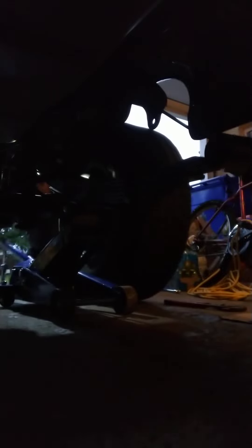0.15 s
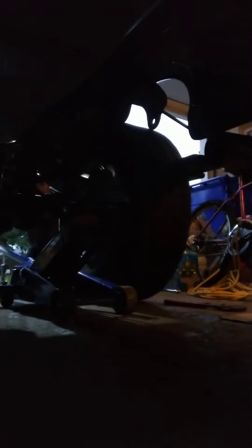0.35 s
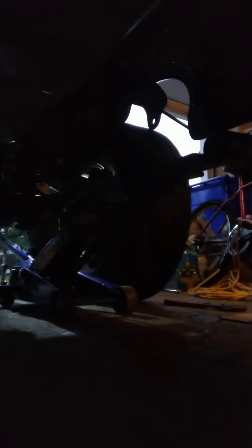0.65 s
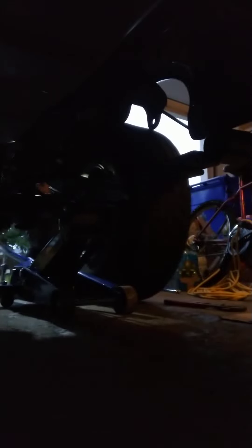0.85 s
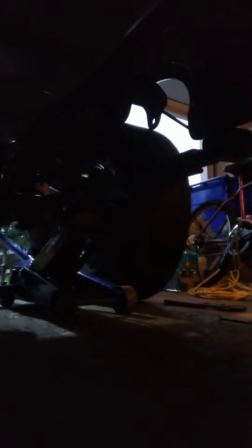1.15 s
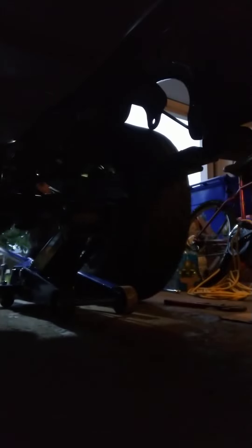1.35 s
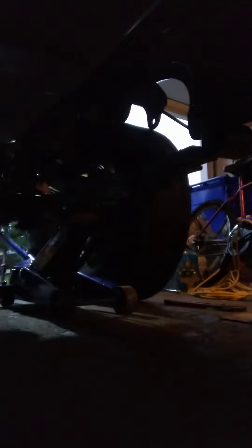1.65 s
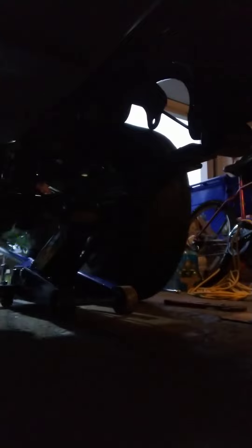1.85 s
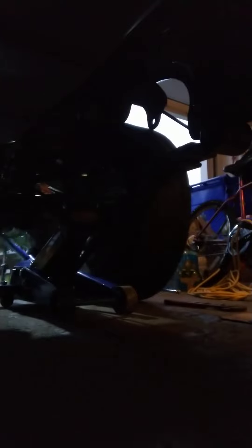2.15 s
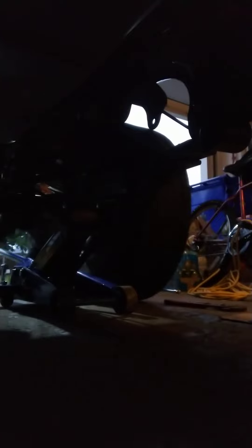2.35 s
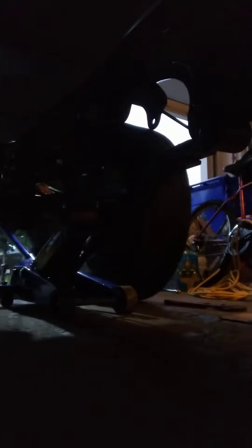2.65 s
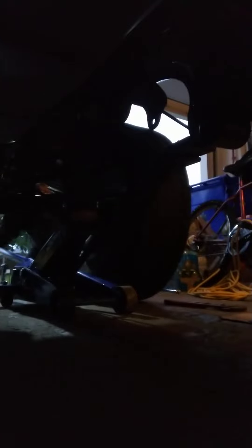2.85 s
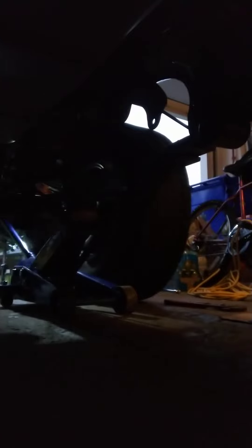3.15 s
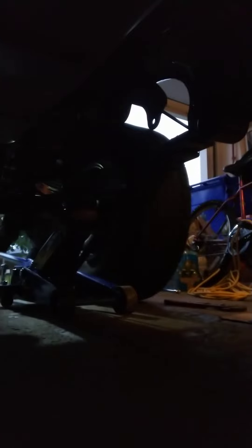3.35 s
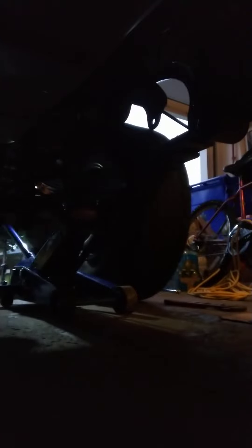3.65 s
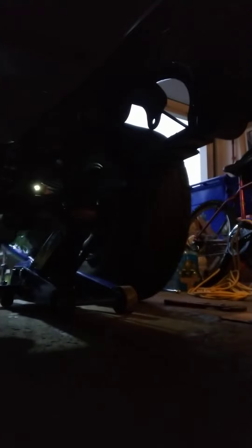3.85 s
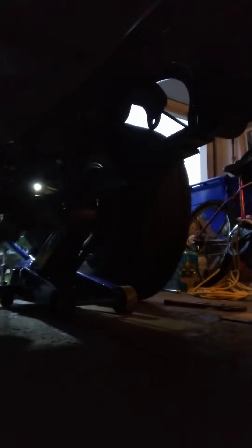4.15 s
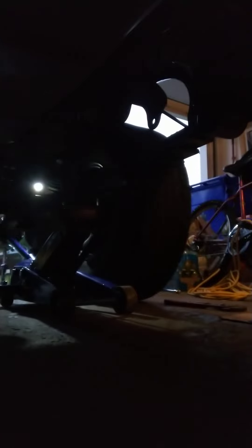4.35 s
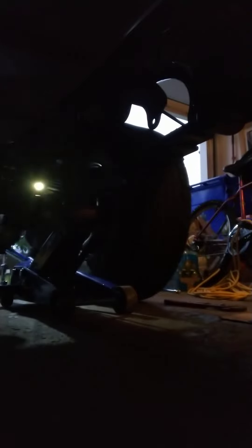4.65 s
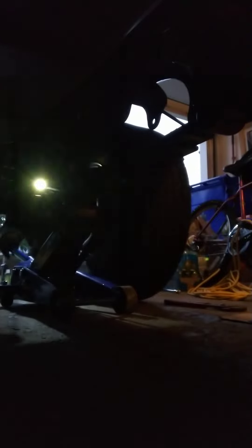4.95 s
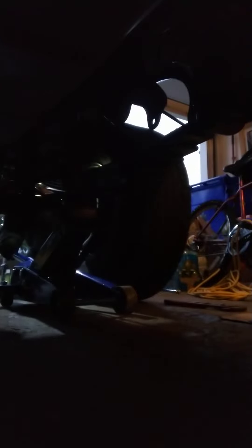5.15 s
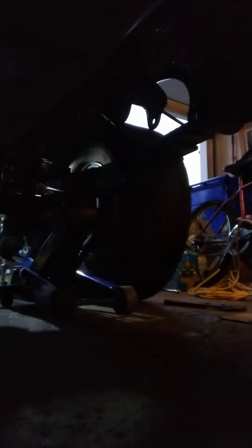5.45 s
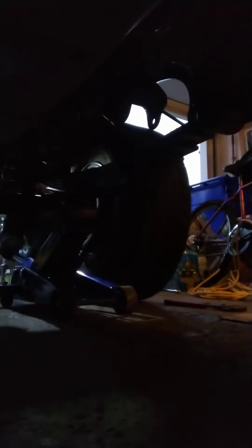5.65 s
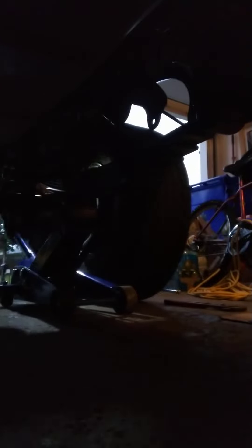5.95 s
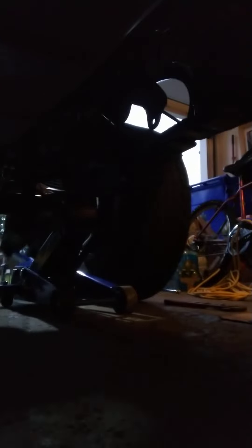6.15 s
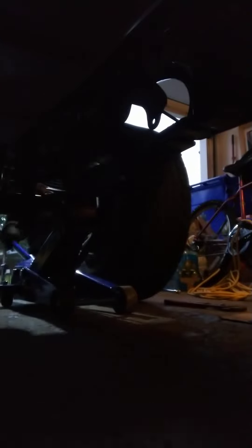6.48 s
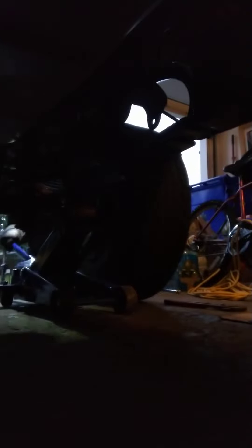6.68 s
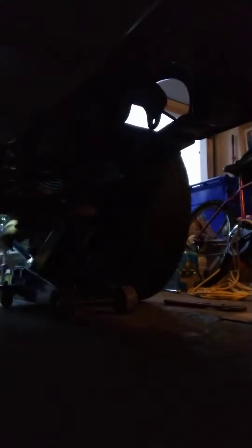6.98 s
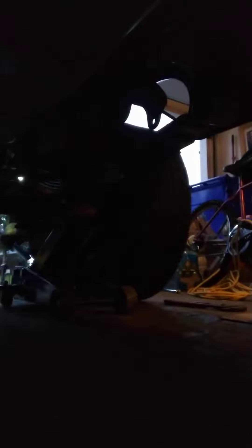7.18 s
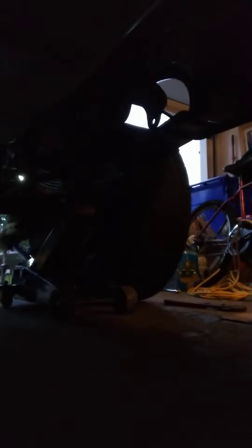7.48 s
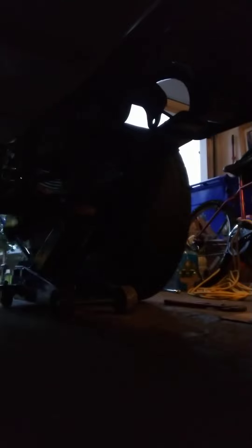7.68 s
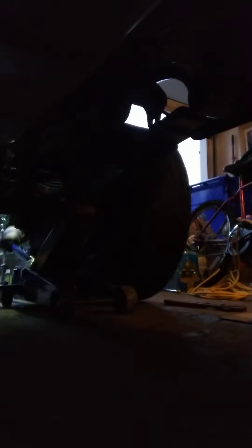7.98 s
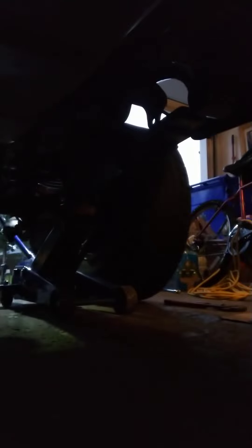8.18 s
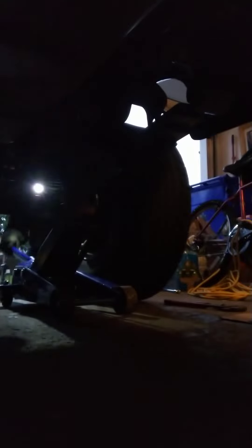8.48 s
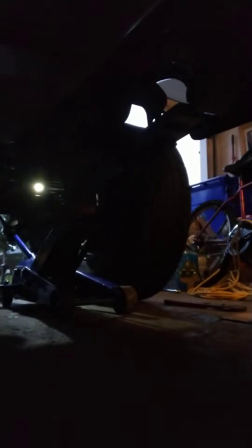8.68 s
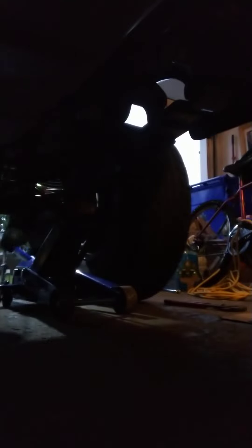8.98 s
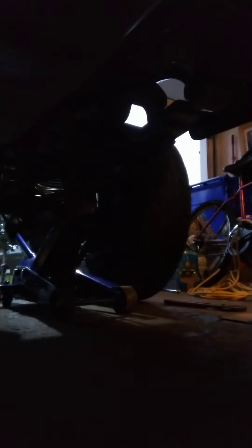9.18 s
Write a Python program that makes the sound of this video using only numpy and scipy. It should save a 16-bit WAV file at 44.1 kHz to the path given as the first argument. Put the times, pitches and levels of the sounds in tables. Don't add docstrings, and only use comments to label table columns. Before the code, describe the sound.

Close, floor-level sound of loose steel knocking steel in a garage. Uneven clicks, clinks and hard rattling knocks mark each stroke of a jack; early snaps are the sharpest. Past the middle, a sole scrapes concrete and the load drops with a deep ringing clank. Later slams leave short singing handle tones. Low floor thuds stir beneath, while background hiss fades away between hits.

```python
import sys
import numpy as np
from scipy import signal
from scipy.fft import rfft, irfft, next_fast_len
from scipy.io import wavfile
from scipy.ndimage import uniform_filter1d

SR = 44100
rng = np.random.default_rng(int(sys.argv[2]) if len(sys.argv) > 2 else 0)


def generate_wav(signal):
    frames = np.transpose(np.atleast_2d(signal))
    scaled = np.clip(frames, -1, 1) * 32767
    pcm = np.round(scaled).astype(np.int16)
    wavfile.write(sys.argv[1], SR, pcm)


def boost(x):
    u = np.asarray(x, float) / 20
    return 10 ** u


N = 411012
FFT_SIZE = next_fast_len(N)

# start_s, level_db
GATE = [(0.0, -45.5), (0.36, -50.5), (0.52, -53.5), (0.83, -58), (0.95, -54.5), (1.75, -55.5), (1.92, -58),
        (2.1, -57.5), (2.6, -60.5), (3.2, -65), (3.7, -65), (4.36, -65.5), (4.52, -65.5), (5.3, -68),
        (5.45, -80), (5.92, -77.5), (5.98, -62), (6.08, -81)]
# pitch_hz, density_db (per Hz)
HISS_COLOUR = [(1180, -35), (2000, -15.5), (3260, -9), (4440, -6), (4880, -6.5), (6810, 0), (8080, -9.5),
               (9840, -12.5), (13600, -23.5), (14700, -27), (15500, -37.5)]
ROOM_COLOUR = [(94, -33), (160, -8.5), (231, -5), (281, -11), (411, -6.5), (600, -7), (850, 1.5),
               (2180, -2), (3000, -3), (3900, -38), (6600, -120)]
RUMBLE_COLOUR = [(15, -51), (25, -22.5), (86, 5), (123, -0.5), (150, -11.5), (200, -19), (260, -41.5),
                 (440, -120)]
# start_s, rumble_db, drone_db, length_s
HEAVES = [(0.37, -58, -63.5, 0.54), (0.568, -74, -67.5, 0.83), (0.904, -62, -64, 0.59),
          (1.276, -80, -68, 0.14), (1.4, -62, -67, 0.38), (1.81, -66, -67.5, 0.21),
          (1.92, -67, -69.5, 0.11), (2.32, -66, -71, 0.31), (2.433, -65.5, -72, 0.29),
          (2.93, -63, -64.5, 0.39), (3.513, -63, -67, 0.23), (3.67, -67, -95, 0.12),
          (3.967, -64, -98, 0.35), (4.345, -71, -101.5, 0.44), (4.665, -56.5, -63, 0.26),
          (4.838, -62.5, -82, 0.13), (5.439, -70, -99, 0.2), (5.892, -74, -99, 0.51),
          (6.073, -57, -68, 0.073), (6.18, -56, -59.5, 0.16), (6.336, -54.5, -59.5, .3),
          (6.801, -70.5, -107.5, 0.32), (7.448, -67.5, -72, 0.22), (7.784, -64.5, -69, 0.21),
          (7.91, -67.5, -75, 0.41), (8.095, -72, -83, .15), (8.334, -69, -81.5, 0.75),
          (8.883, -60.5, -84, 0.13), (9.029, -60.5, -70, 0.2), (9.32, -62.5, -99, 0.1)]
# start_s, level_db
SCUFF = [
    (5.36, -86),
    (5.372, -73),
    (5.414, -56),
    (5.454, -51.5),
    (5.516, -56),
    (5.602, -70),
    (5.626, -67.5),
    (5.68, -78.5),
]

# pitch_hz, level_db, t60_s
CHASSIS = [(234, -6, 0.26), (299, -12, 0.29), (454, -14, 0.15), (575, -9, 0.14), (535, -17, .23),
           (685, -15, .12), (775, -9.5, 0.21), (877, -10.5, 0.24), (1453, -15.5, 0.13), (2950, -6, 0.08)]
STAND = [(5200, -3, .076), (5260, -6, .08), (5830, -4.5, 0.12), (5960, -8, .12), (7000, -3.5, .14),
         (7445, -9.5, 0.2), (7860, -8, 0.15), (8300, -11, .08), (8355, -15, .14), (8590, -8, .05),
         (9604, -8, 0.1), (10500, -9, .1), (12600, -18, .08)]
# start_s, level_db, pitch_hz, t60_s
THUMPS = [
    (4.578, -56.5, 368, 0.49),
    (4.618, -46.5, 378, 0.18),
    (4.615, -53, 430, 0.11),
    (6.335, -44, 423, 0.1),
    (6.33, -51, 820, .1),
    (0.208, -49, 900, 0.14),
    (0.025, -51.5, 750, 0.13),
    (0.215, -56, 720, 0.11),
]
# start_s, level_db, pitch_hz, t60_s
PINGS = [(4.491, -48, 1330, .08), (4.628, -50, 2363, .12), (4.622, -47, 2713, 0.12),
         (4.622, -47, 4450, .12), (4.63, -61, 1567, 0.49), (6.339, -39, 6100, 0.11),
         (6.338, -34.5, 4400, 0.059), (6.339, -43, 5230, .06), (6.338, -36, 2820, 0.061),
         (6.438, -48, 7700, 0.094), (6.44, -54, 6900, .12), (7.822, -46, 1270, 0.059),
         (7.825, -45, 4680, .12), (9.275, -48.5, 5860, 0.099), (0.75, -54, 4050, .06),
         (0.834, -54, 2050, .06), (0.836, -59, 2550, .05), (0.4, -54.5, 1000, 0.22),
         (0.748, -53, 1050, .07), (7.734, -44.5, 2950, 0.088), (9.272, -56, 2900, 0.092),
         (9.27, -57, 1700, .1), (2.45, -61, 1800, 0.086), (6.287, -50, 7500, .1), (7.835, -49, 6050, .12)]

# pitch_hz, t60_s, blow_column
HANDLE_MODES = [(1150, 0.55, 1), (1743, 0.32, 2), (3260, 0.18, 3), (4820, 0.13, 4), (5930, 0.25, 4),
                (6170, 0.1, 4), (7280, 0.097, 4)]
SOCKET_MODES = [(1520, 0.11, 1), (2650, 0.13, 2), (2870, 0.052, 2)]
# start_s, low_db, middle_db, singing_db, upper_db
HANDLE_BLOWS = [
    (4.501, -62, -55, -47, -73),
    (4.63, -65, -67, -60, -61),
    (6.035, -46.5, -56, -57, -35.5),
    (6.312, -55.5, -59, -66, -61),
    (6.806, -70.5, -71, -47.5, -56),
    (7.29, -62.5, -62, -45.5, -62),
    (7.837, -69, -53, -40.5, -55),
    (8.35, -72, -74, -45, -64),
    (8.856, -70, -68, -56, -52),
]
# start_s, lower_db, upper_db
SOCKET_BLOWS = [(0.75, -52, -77), (2.25, -66, -69), (2.784, -46, -69), (3.307, -59, -75), (4.491, -61, -56),
                (4.623, -55, -47), (4.728, -55, -62), (4.775, -73, -76), (6.338, -49, -47),
                (6.794, -43.5, -50), (7.284, -51, -45), (7.734, -52.5, -56), (8.301, -87, -75),
                (8.343, -45.5, -48), (8.755, -69, -77.5), (8.853, -51, -65), (8.976, -64, -57),
                (9.271, -62, -64)]

# pitch_hz, density_db (per Hz)
KNOCK_COLOUR = [(88, -32), (150, -17), (253, -2.5), (370, 0), (812, -10.5), (1270, -5), (1760, -8),
                (2270, -12), (3040, -2.5), (4480, -7), (4930, -2), (7710, -0.5), (13500, -18), (14800, -15),
                (15500, -33)]
# start_s, tick_db, body_minus_tick_db, t60_s
SNAPS = [
    (0.383, -18, -32, 0.053),
    (0.8951, -16.5, -26, 0.038),
    (1.8686, -27, -24, 0.061),
]
STOPS = [(0.2074, -44, -7, 0.14), (0.2458, -33, -7.5, 0.065), (0.746, -37, -10.5, 0.091),
         (1.2274, -37.5, -10, 0.08), (2.2478, -36, -9, 0.075), (2.911, -59.5, 6, 0.088),
         (3.306, -41, -4.5, 0.089), (3.4554, -57.5, 3, 0.088), (3.872, -41, -6, 0.058),
         (5.1564, -62.5, -3.5, 0.19), (5.1994, -53.5, -30, 0.063), (5.2974, -44.5, -27, 0.099),
         (6.1503, -37, -10.5, 0.12), (6.2846, -48.5, -28, 0.1), (7.4174, -58, 0.5, 0.13),
         (7.4525, -59.5, 3, 0.1), (8.2484, -65, -6, 0.094), (8.7534, -69, 2, 0.14),
         (9.0086, -56.5, -3, 0.11)]
SLAMS = [(0.3474, -43, -11, 0.061), (0.834, -46, -6.5, 0.12), (1.7495, -36, -9.5, 0.067),
         (2.7828, -38.5, -9, 0.091), (4.4892, -28, -10.5, 0.07), (4.5884, -46, -2.5, 0.2),
         (6.3083, -49.5, -4.5, 0.67), (6.3395, -27.5, -14, 0.14), (6.794, -30.5, -11.5, 0.1),
         (7.2803, -29, -11, 0.12), (7.7303, -45, -5.5, 0.13), (7.8225, -30.5, -8.5, 0.09),
         (7.838, -35.5, -14, 0.08), (8.3397, -27.5, -11, 0.084), (8.8488, -28, -11.5, 0.093),
         (8.975, -52, 2.5, 0.13), (9.2672, -42.5, -10.5, 0.13), (9.2768, -44, -15, 0.14)]
VALVE_CLICKS = [(0.0294, -51.5, 9.5, 0.028), (1.4815, -35.5, -18, 0.12), (1.9828, -40, -15.5, 0.23),
                (2.9952, -37, -13.5, 0.089), (3.537, -38.5, -13, 0.087), (5.8667, -41.5, -16.5, 0.18),
                (6.438, -40.5, -16, 0.093), (7.0335, -37, -19, 0.16), (7.5013, -39, -12, 0.069),
                (8.0495, -34.5, -15.5, 0.073), (8.581, -36.5, -20.5, 0.11), (8.8434, -51.5, -21, 0.079),
                (9.025, -39.5, -17.5, 0.073), (9.0477, -35.5, -19.5, 0.097)]
LINK_CLINKS = [(0.9667, -43.5, -9, 0.076), (1.7026, -46, -11.5, 0.14), (2.448, -51.5, -5.5, 0.11),
               (2.499, -43.5, -9.5, 0.097), (2.8654, -39, -18, 0.063), (3.2824, -57.5, -5, 0.098),
               (3.5017, -44, -9.5, 0.094), (3.8365, -52.5, -8, 0.25), (3.9614, -57.5, -6, 0.091),
               (4.1734, -48.5, -10.5, 0.11), (4.564, -38.5, -14, 0.075), (4.6194, -27, -12.5, 0.076),
               (4.728, -54.5, 2, 0.074), (4.7734, -62.5, 3, 0.12), (6.7352, -59, -19.5, 0.3),
               (7.9734, -62, 1.5, 0.067), (8.0064, -58, 3.5, 0.097), (8.8117, -80.5, 4, 0.13)]

CLANK_S, CLANK_DB = 6.026, -24
# knocks, edge_minus_tick_db, steel_minus_tick_db, lead_in_before_contact_db
KINDS = [(SNAPS, -50, -4, -29), (STOPS, -9, -11, -21), (SLAMS, -11, -5.5, -16),
         (VALVE_CLICKS, -26, -33.5, -25), (LINK_CLINKS, -32, 0.1, -25),
         ([(CLANK_S, -2, -20, 0.1138)], -10, -6.5, -41)]

# pitch_hz, left_minus_right_db, likeness (0-1)
PORTS = [(59.1, 8.5, 0.98), (252, 2.5, 0.95), (606, -6, 0.45), (1989, -5.5, 0.3), (5070, -7, 0),
         (7970, -5, 0.9), (10700, -10, .4), (14000, -3.5, 0.6)]
# pitch_hz, level_db
SILL = [(150, -125), (450, -101), (2100, -100), (4200, -97.5), (6500, -108), (8500, -100), (11000, -104),
        (12300, -98.5), (15500, -98)]


def on_log(hz, table, column):
    table = np.array(table)
    return np.interp(np.log(hz + 1), np.log(table[:, 0]), table[:, column])


def curve(table):
    s, *columns = np.transpose(table)
    return [np.interp(np.arange(N) / SR, s, c) for c in columns]


def noise(colour, lo_hz=1., hi_hz=1e6, jag_db=0):
    hz = np.fft.rfftfreq(FFT_SIZE, 1 / SR)
    inside = (hz > colour[0][0]) & (hz < colour[-1][0])
    shape = boost(on_log(hz, colour, column=1) + jag_db) * inside
    shape = shape / np.sqrt((1 + (lo_hz / (hz + 1)) ** 6) * (1 + (hz / hi_hz) ** 6))
    chance = rng.standard_normal((2, 2, len(hz)))
    out = irfft((chance[0] + 1j * chance[1]) * shape, FFT_SIZE)[:, :N]
    return out / out.std()


def walk(rate):
    k = int(SR / rate)
    return uniform_filter1d(np.repeat(rng.standard_normal(N // k + 1), k), k)[:N]


def mix_db(*dbs):
    return 10 * np.log10(sum(boost(2 * np.asarray(db)) for db in dbs) + 1e-30)


def power_decay(t60_s):
    return np.exp(-2 * np.log(1000) / (t60_s * SR))


def every_knock():
    return [(s, tick_db, edge_db, steel_db, body_db, t60, lead_db)
            for rows, edge_db, steel_db, lead_db in KINDS
            for s, tick_db, body_db, t60 in rows]


def held_open():
    kicks = np.zeros(N)
    for s, tick_db, *_ in every_knock():
        kicks[int(s * SR)] += boost(2 * (-64.5 + 0.28 * (tick_db + 29.5)))
    held = signal.lfilter([1], [1, -power_decay(0.99)], kicks)
    soft = np.exp(-1 / (0.036 * SR))
    return 10 * np.log10(signal.lfilter([1 - soft], [1, -soft], held) + 1e-30)


def heaves():
    t = np.arange(N) / SR
    rumble, drone = np.zeros((2, N))
    for s, rumble_db, drone_db, length in HEAVES:
        near = slice(max(int((s - 3 * length) * SR), 0), int((s + 3 * length) * SR))
        away = np.maximum(t[near] - s, (s - t[near]) / 0.75) / length
        swell = boost(-2 * 20 * away)
        rumble[near] += boost(2 * rumble_db) * swell
        drone[near] += boost(2 * drone_db) * swell ** 1.9
    return 10 * np.log10(np.array([rumble, drone]) + 1e-30)


def gate():
    hiss_db = curve(GATE)[0]
    closing = hiss_db - GATE[0][1]
    rumble_db, drone_db = heaves()
    return (mix_db(hiss_db, held_open()), mix_db(-53 + 1.266 * closing, drone_db),
            mix_db(-58 + 2.5 * closing, drone_db), mix_db(-68 + 1.1 * closing, rumble_db))


def garage():
    hiss_db, hum_db, drone_db, rumble_db = gate()
    hiss = noise(HISS_COLOUR) * boost(hiss_db + 0.38 * walk(20))
    hum = noise(ROOM_COLOUR, lo_hz=480) * boost(hum_db + 1.8 * walk(30))
    drone = noise(ROOM_COLOUR, hi_hz=473) * boost(drone_db + 4.3 * walk(6.7))
    rumble = noise(RUMBLE_COLOUR) * boost(rumble_db + 0.76 * walk(7.4))
    return hiss + hum + drone + rumble


def scuff():
    t = np.arange(N) / SR
    sliding = (t > SCUFF[0][0]) & (t < SCUFF[-1][0])
    grit = noise(HISS_COLOUR) + boost(-17.5) * noise(ROOM_COLOUR)
    return grit * boost(curve(SCUFF)[0] + 1.1 * walk(330)) * sliding


def strike(modes, push_s, twin, waver_db):
    out, t = np.zeros(N + SR), np.arange(SR // 3) / SR
    for s, db, hz, t60 in modes:
        grit = rng.standard_normal(len(t))
        fade = np.exp(-np.log(1000) * t / t60)
        twin_hz = hz + 22 * (np.sign(grit[0]) + .4 * grit[1])
        ring = np.sin(2 * np.pi * hz * t + 2 * grit[2])
        ring += twin * fade ** .5 * np.sin(2 * np.pi * twin_hz * t + 2 * grit[3])
        waver = boost(waver_db * uniform_filter1d(grit, size=600) * np.sqrt(600))
        out[int(s * SR):][:len(t)] += boost(db) * (1 - np.exp(-t / push_s)) * fade * waver * ring
    return out[:N]


def axle_boom():
    peak_s, rise_s, damped_s = 6.07, .025, 6.174
    t = np.arange(N) / SR
    since = t - peak_s
    boom_db = np.maximum(-31.5 - 60 * abs(since) / .22, -41.5 - 60 * abs(since) / 2.5)
    boom_db = boom_db - 20 * np.maximum(-since, 0) / rise_s
    boom_db = boom_db - 10 * np.clip((t - damped_s) / .008, 0, 1)
    boom_db = boom_db - 60 * np.maximum(t - damped_s, 0) / 1.3 + 3 * walk(30)
    return boost(boom_db) * np.sin(2 * np.pi * 200 * since + 0.73 * walk(30)) * (t > CLANK_S)


def clank():
    chassis = [(CLANK_S, CLANK_DB + db, hz, t60) for hz, db, t60 in CHASSIS]
    stand = [(CLANK_S, CLANK_DB + db, hz, t60) for hz, db, t60 in STAND]
    dull = strike(chassis + THUMPS, .0034, twin=0.58, waver_db=3.5)
    bright = strike(stand, 0.0017, twin=1.0, waver_db=3.5)
    pings = strike(PINGS, 0.00075, twin=0.56, waver_db=2.0)
    return axle_boom() + dull + bright + pings


def handle():
    rings = []
    for blows, modes in [(HANDLE_BLOWS, HANDLE_MODES), (SOCKET_BLOWS, SOCKET_MODES)]:
        rings += [(blow[0], blow[round(k)], hz, t60) for blow in blows for hz, t60, k in modes]
    return strike(rings, 0.003, twin=.35, waver_db=2.)


def frame(peaky_db, width_hz):
    k = int(width_hz * FFT_SIZE / SR)
    steps = np.repeat(rng.standard_normal(N // 500), k)
    return peaky_db * uniform_filter1d(steps, k)[:FFT_SIZE // 2 + 1]


def shudder(db, t60, rise_s):
    lead_s = .008
    power, t = np.zeros(N + SR), np.arange(SR // 2) / SR - lead_s
    after = np.maximum(t, 0)
    rise = (1 - np.exp(-after / rise_s)) ** 2
    lead = np.exp(np.minimum(t, 0) / 0.0023)
    for (s, *_, lead_db), peak, fall in zip(every_knock(), boost(2 * db), t60):
        decay = np.exp(-2 * np.log(1000) * after / fall)
        power[int((s - lead_s) * SR):][:len(t)] += peak * (rise + boost(2 * lead_db) * lead) * decay
    keep = power_decay(0.22)
    tail = signal.lfilter([1 - keep], [1, -keep], power[:N]) * boost(2 * (-17 + 13))
    return np.sqrt(power[:N] + tail)


def knocks():
    _, tick_db, edge_db, steel_db, body_db, t60, _ = np.transpose(every_knock())
    t60 = np.clip(t60, .02, .6)
    rattle = boost(1.2 * walk(500))
    # lo_hz, hi_hz, level_db, slower (times t60), rise_s
    layers = [(7900, 28000, edge_db - 3, 1.4, .0006), (5030, 4860, -8.5, 0.84, 0.00072),
              (1940, 3700, steel_db - 9.0, 1.4, 0.0032), (660, 1770, body_db - 2.5, 1.336, 0.0011),
              (224, 410, body_db - 27, 5.9, 0.0049)]
    out = 0
    for lo_hz, hi_hz, db, slower, rise_s in layers:
        modes = noise(KNOCK_COLOUR, lo_hz, hi_hz, frame(peaky_db=4.5, width_hz=60))
        out = out + rattle * modes * shudder(tick_db + db, slower * t60, rise_s)
    return out


def scene():
    direct, scattered = rfft(garage() + scuff() + clank() + handle() + knocks(), FFT_SIZE)
    hz = np.fft.rfftfreq(FFT_SIZE, 1 / SR)
    pan = boost(on_log(hz, PORTS, column=1) / 2)
    like = np.clip(on_log(hz, PORTS, column=2), 0, 1)
    lag_s = 0.00017
    late = np.exp(-2j * np.pi * hz * lag_s - 1.9j * np.clip((hz - 7600) / 1200, 0, 1))
    left = pan * (like * late * direct + np.sqrt(1 - like ** 2) * scattered)
    return irfft(np.array([left, direct / pan]), FFT_SIZE)[:, :N] * boost(1.45)


def mute_faint_bands(x):
    hz, _, z = signal.stft(x, SR, nperseg=2048)
    power = np.abs(z[:, :1024]) ** 2 + 1e-18
    bands = power.reshape(2, 128, 8, -1).mean(axis=2)
    band_hz = hz[4:1024:8]
    loud_db = 10 * np.log10(power.sum(axis=1, keepdims=True))
    fickle = uniform_filter1d(rng.standard_normal(bands.shape), size=4) * 2
    low = 1 / (1 + (band_hz[:, None] / 11000) ** 6)
    sill_db = on_log(band_hz, SILL, column=1)[:, None] + 0.94 * np.minimum(loud_db + 61.5, 8) * low
    sill_db = sill_db + 5.5 * fickle * (.4 + .6 * low)
    z[:, :1024] *= np.repeat(bands > boost(2 * sill_db), 8, axis=1)
    return signal.istft(z, SR, nperseg=2048)[1][:, :N]


def band_limit(x):
    return signal.sosfilt(signal.butter(12, 16130, fs=SR, output="sos"), x)


def record(dry):
    soft = .86 * np.tanh(dry / .86)
    soft = signal.sosfilt(signal.butter(3, 42, "high", fs=SR, output="sos"), soft)
    soft = signal.sosfilt(signal.ellip(8, .3, 70, 15600, fs=SR, output="sos"), soft)
    return band_limit(mute_faint_bands(soft))


dry = scene()
out = record(dry)
generate_wav(out)
```